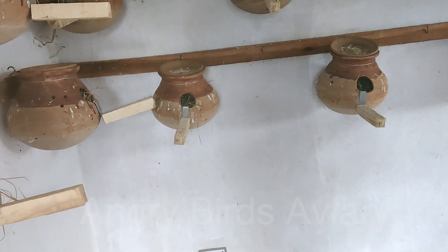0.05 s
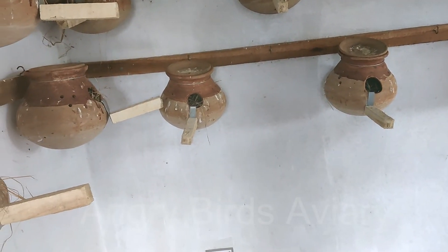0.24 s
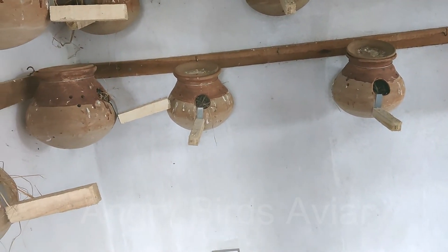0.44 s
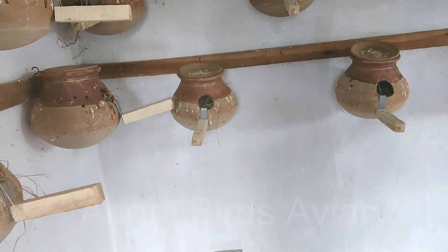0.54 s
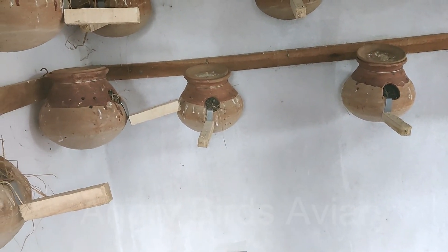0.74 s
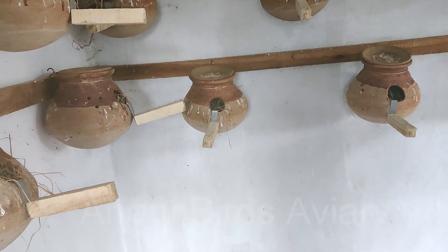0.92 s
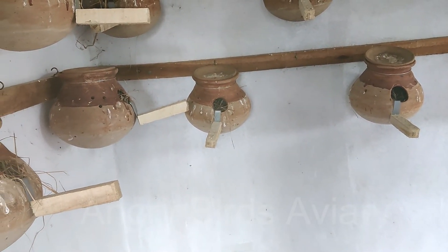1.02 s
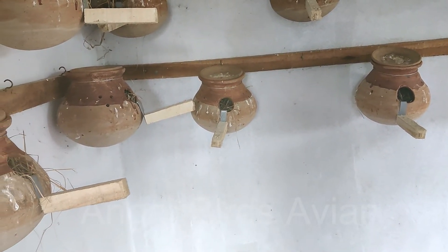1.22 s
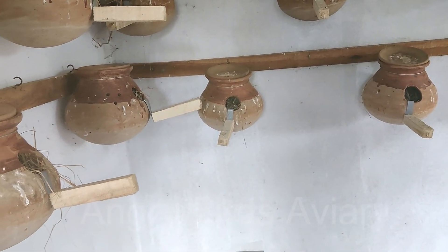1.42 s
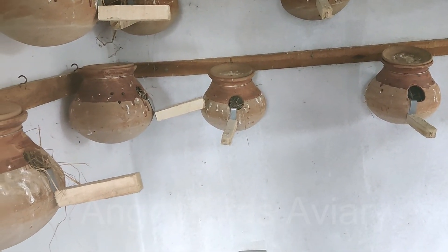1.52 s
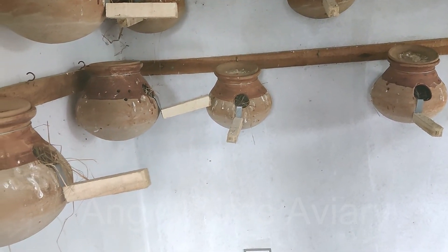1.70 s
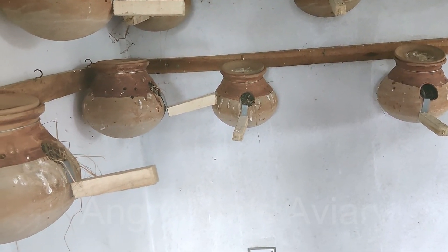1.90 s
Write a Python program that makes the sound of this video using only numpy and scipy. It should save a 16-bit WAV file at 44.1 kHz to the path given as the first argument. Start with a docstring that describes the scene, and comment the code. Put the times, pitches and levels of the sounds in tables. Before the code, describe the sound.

Short, high finch chips and fainter warbled peeps ring off bare aviary walls.

```python
"""Small finches in a hard-walled aviary. Room air, a faint rustle and a wavering low hum run throughout.
In the first 0.8 s one or two close birds give short upswept chips, their overtones shaped by the throat.
From about 1 s the rustle dies down and others answer from farther off with thin warbled peeps.
The bare walls make every call ring on."""
import sys
import numpy as np
from scipy import signal
from scipy.fft import rfft, irfft
from scipy.io import wavfile

SR = 44100
rng = np.random.default_rng(int(sys.argv[2]) if len(sys.argv) > 2 else 0)


def output_pcm(signal):
    """Save a mono or channel-first signal as 16-bit PCM at the path in sys.argv[1].

    Samples are clipped to [-1, 1] before scaling.
    """
    pcm = np.clip(np.atleast_2d(signal).T, -1, 1) * 32767
    wavfile.write(sys.argv[1], SR, np.round(pcm).astype(np.int16))


N = 85995

# Room air, spectral shape: freq_hz, density_db
AIR_SPECTRUM = [(35, -33.5), (60, -7), (132, 0.5), (219, -16), (399, -10.5), (514, -13), (1360, -20.5),
                (2710, -16), (3270, -13.5), (4410, -23.5), (6380, -19.5), (7000, -24), (7500, -62),
                (9020, -37), (15000, -56.5)]
# Rustle, spectral shape: freq_hz, density_db
RUSTLE_SPECTRUM = [(150, -4), (400, -5.5), (800, -12), (1300, -6.5), (2200, -2.5), (3200, -9.5), (4300, -5),
                   (6600, -5), (7700, -21), (9800, -21.5), (12000, -32.5), (15000, -31.5)]
# Rustle envelope: time_s, level_db
RUSTLE_ENVELOPE = [(0, -38), (.025, -45), (.11, -50.5), (.2, -44), (.42, -52), (.5, -47.5), (.65, -49.5),
                   (.85, -53.5), (1.0, -59.5), (1.95, -75.5)]
# Low hum envelope: time_s, level_db
HUM_ENVELOPE = [(0.0, -48.5), (0.102, -40), (0.314, -43), (0.504, -59.5), (0.65, -52), (0.754, -60.5),
                (1.128, -61), (1.226, -53), (1.618, -49), (1.95, -58.5)]
# Drone lines: pitch_hz, base_level_db
DRONE_LINES = [(118.4, -61.5), (172.3, -71.5)]
# Gain on both drone lines: time_s, gain_db
DRONE_ENVELOPE = [(0, 11.5), (.2, 7), (.35, -0.5), (.52, 9), (.8, 0), (1.2, -4.5), (1.95, -3.5)]
# Distant peeps: start_s, length_s, from_hz, to_hz, warble_ratio, gain_db, octave_db, pan_db
FAR_PEEPS = [(1.056, 0.027, 3403, 3230, 0.038, -46.5, -33, -14.5),
             (1.061, .080, 2998, 2994, 0.054, -43, -18, -2.5),
             (1.138, .080, 3253, 2830, 0.035, -43.5, -11.5, -4.5),
             (1.28, 0.067, 3200, 3400, 0.089, -48, -37, -4),
             (1.328, 0.051, 3250, 3316, 0.044, -44, -22, -10.5),
             (1.336, 0.06, 3970, 3850, 0.11, -42.5, -32, -1.5), (1.531, .085, 4150, 3550, 0.1, -46, -35, 2),
             (1.576, 0.093, 3630, 4080, 0.084, -39, -54, -4), (1.613, .048, 5328, 4876, .10, -34, -44, -4),
             (1.588, 0.079, 2356, 2420, 0.1405, -53, 13.5, -7),
             (1.683, 0.11, 4697, 4650, 0.066, -43.5, -55, -2),
             (1.745, 0.08, 3827, 3615, 0.076, -34.5, -61, -2),
             (1.771, 0.05, 6500, 6200, 0.04, -44, -74, -1),
             (1.817, 0.0737, 3750, 3473, 0.056, -46.5, -51, -14.5),
             (1.896, 0.057, 2464, 2464, 0.0033, -56, -16, -6)]
# Close chips: start_s, length_s, top_hz, sweep_ratio, rise_s, throat_hz, gain_db,
# partial1_db, partial2_db, partial3_db, partial4_db, pan_db
CLOSE_CHIPS = [(0.024, 0.014, 2196, 0.051, 0.0022, 3880, -56.5, 17, -8, 10, -29, -19),
               (0.164, 0.025, 2071, 0.37, 0.005, 4120, -35, 8.5, 2.5, -1.5, -15.5, -4),
               (0.329, 0.025, 1942, 0.33, 0.0041, 3800, -35, -2.5, -0.5, 2.5, -23, -4.5),
               (0.332, .017, 1477, 0.41, 0.0044, 2600, -38, -27.5, 6, 8, -14, -4),
               (0.504, 0.024, 1590, 0.21, 0.00486, 3870, -25.5, -11.5, 1, -1.5, -17, -2),
               (0.59, 0.0238, 1641, 0.2084, 0.00638, 3560, -21.5, -35, 2, -2, -8, -0.5),
               (0.669, 0.018, 1808, 0.26, 0.0067, 3120, -22.5, -18, 1.5, -7.5, -8, -3),
               (0.793, .019, 1671, 0.182, 0.0049, 3460, -18.5, -21, -0.5, -2.5, -18, -3)]

ROOM_T60_S, TREBLE_T60_S, BUILD_S, EARLY_S = 0.43, 0.13, 0.012, 0.091
SLAP_S, SLAP_GAIN = 0.0174, 0.49
WARBLE_HZ, JITTER_HZ = 133.3, 850


def undb(db):
    """Decibels to gain."""
    return 10 ** (np.asarray(db) / 20)


def unit_rms(x):
    """Scale to rms 1."""
    return x / np.sqrt(np.mean(x ** 2))


def pan(db):
    """Stereo gains for a left-minus-right level."""
    return undb(np.array([[db], [-db]]) / 2)


def envelope(points):
    """Gain over time from time_s, level_db points."""
    return undb(np.interp(np.arange(N) / SR, *np.array(points).T))


def swell(t, length_s, attack_s, release_s):
    """Smooth attack, hold and release."""
    attack = np.sin(np.pi / 2 * np.clip(t / attack_s, 0, 1)) ** 2
    release = np.sin(np.pi / 2 * np.clip((length_s - t) / release_s, 0, 1)) ** 2
    return attack * release


def wander(bandwidth_hz, size=N):
    """Smooth random motion, rms 1."""
    f = np.fft.rfftfreq(size, 1 / SR)
    return unit_rms(irfft(rfft(rng.standard_normal(size)) * np.exp(-(f / bandwidth_hz) ** 2), size))


def tremble(t, bandwidth_hz):
    """Random motion over one call."""
    return wander(bandwidth_hz, size=8192)[:len(t)]


def add(out, start_s, sound):
    """Mix in a stereo sound."""
    i = int(start_s * SR)
    out[:, i:i + sound.shape[1]] += sound[:, :max(N - i, 0)]


def stereo_noise(spectrum, alike_below_hz=800):
    """Shaped noise, rms 1, alike on both sides only in the bass."""
    f = np.fft.rfftfreq(N, 1 / SR) + 1
    hz, db = np.array(spectrum).T
    shape = undb(np.interp(np.log(f), np.log(hz), db)) / np.hypot(1, (hz[0] / f) ** 2)
    mid, side = rfft(rng.standard_normal((2, N))) * shape
    side = side * f / np.hypot(f, alike_below_hz)
    return unit_rms(irfft(np.array([mid + side, mid - side]), N))


def drifting_tone(hz, drift_ratio):
    """Sine of slowly wandering pitch, rms 1."""
    pitch_hz = hz * (1 + drift_ratio * wander(5.7))
    return np.sqrt(2) * np.sin(2 * np.pi * np.cumsum(pitch_hz) / SR)


def room_air():
    """Steady noise of the room's air."""
    return undb(-59.5) * stereo_noise(AIR_SPECTRUM)


def rustle():
    """Soft noise, slightly to the right, dying down."""
    noise = stereo_noise(RUSTLE_SPECTRUM)
    flicker_db = 0.5 * wander(40)
    return pan(-2) * noise * envelope(RUSTLE_ENVELOPE) * undb(flicker_db)


def hum(pitch_hz=43.1):
    """Low hum that swells and fades under two unsteady drone lines."""
    drone = sum(undb(db) * drifting_tone(hz, drift_ratio=0.0231) * (1 + 0.39 * wander(60))
                for hz, db in DRONE_LINES)
    low = drifting_tone(pitch_hz, drift_ratio=0.007) * (1 + 0.12 * wander(25))
    return envelope(HUM_ENVELOPE) * low + envelope(DRONE_ENVELOPE) * drone


def aviary(call, direct_db, room_db, direct_pan_db=0, right_lag_s=0.00005):
    """Direct sound, then wall echoes that thicken and decay, treble first."""
    t = np.arange(N // 3) / SR
    echoes = rng.standard_normal((2, len(t)))
    clumps = np.repeat(rng.standard_normal((2, len(t) // 32 + 1)), 32, axis=1)[:, :len(t)]
    sparseness = np.exp(-t / EARLY_S)  # early echoes stand apart, later ones merge
    echoes = echoes * np.exp(sparseness * clumps - sparseness ** 2) * (1 - np.exp(-t / BUILD_S))
    low = signal.sosfiltfilt(signal.butter(2, 5500, fs=SR, output="sos"), echoes)
    response = low * undb(-60 * t / ROOM_T60_S) + (echoes - low) * undb(-60 * t / TREBLE_T60_S)
    wet = signal.fftconvolve(call[None], response, axes=1)
    wet *= np.sqrt(np.sum(call ** 2) / np.sum(wet ** 2, axis=1, keepdims=True))
    left = np.pad(call, (0, len(t) - 1))
    direct = np.array([left, np.roll(left, int(right_lag_s * SR))])
    return undb(room_db) * wet + undb(direct_db) * pan(direct_pan_db) * direct


def far_peeps(jitter_ratio=0.032):
    """Gliding whistles with a fast, uneven warble, heard mostly off the walls."""
    out = np.zeros((2, N))
    for start_s, length_s, from_hz, to_hz, warble_ratio, gain_db, octave_db, pan_db in FAR_PEEPS:
        t = np.arange(int(length_s * SR)) / SR
        glide_hz = from_hz + (to_hz - from_hz) * t / length_s
        warble = np.sin(2 * np.pi * WARBLE_HZ * t + tremble(t, WARBLE_HZ))
        pitch_hz = glide_hz * (1 + warble_ratio * warble + jitter_ratio * tremble(t, JITTER_HZ))
        phase = 2 * np.pi * np.cumsum(pitch_hz) / SR
        voice = np.sin(phase) + undb(octave_db) * np.sin(2 * phase)
        voice *= swell(t, length_s, attack_s=0.48 * length_s, release_s=0.48 * length_s)
        heard = aviary(voice, direct_db=-2, room_db=2)
        add(out, start_s, undb(gain_db) * pan(pan_db) * heard)
    return out


def throat(hz, centre_hz, width_hz=1190):
    """Gain of the bird's throat resonance."""
    return 1 / np.hypot(1, (hz / centre_hz - centre_hz / hz) * centre_hz / width_hz)


def scratch(throat_hz, top_hz=5400, size=4096):
    """Noisy part of the voice, centred on the throat resonance."""
    f = np.fft.rfftfreq(size, 1 / SR) + 1
    band = 1 / np.hypot(1, (f / top_hz) ** 4) / np.hypot(1, (throat_hz / 2 / f) ** 4)
    return unit_rms(irfft(rfft(rng.standard_normal(size)) * throat(f, throat_hz) * band, size))


def close_chips(droop_ratio=0.017, rasp_depth=0.28, scratch_db=-10):
    """Pitch shoots up, levels off and droops; the throat shapes partials and scratch."""
    out = np.zeros((2, N))
    upper_db = [-22, -24, -26, -28]  # partials 5 to 8
    for chip in CLOSE_CHIPS:
        start_s, length_s, top_hz, sweep_ratio, rise_s, throat_hz, gain_db, *lower_db, pan_db = chip
        t = np.arange(int(length_s * SR)) / SR
        onset = np.exp(-(t / rise_s) ** 2 / 2)
        pitch_hz = top_hz * (1 - sweep_ratio * onset - droop_ratio * (t / length_s) ** 4)
        jitter_ratio = 0.018 + 0.055 * onset  # rough on the way up, steadier at the top
        phase = 2 * np.pi * np.cumsum(pitch_hz * (1 + jitter_ratio * tremble(t, JITTER_HZ))) / SR
        tone = sum(undb(db) * throat(k * pitch_hz, throat_hz) * np.sin(k * phase)
                   for k, db in enumerate(lower_db + upper_db, 1))
        voice = tone * (1 + rasp_depth * tremble(t, JITTER_HZ))
        voice += undb(scratch_db) * np.std(tone) * scratch(throat_hz)[:len(t)]
        voice *= swell(t, length_s, attack_s=0.005, release_s=0.0027)
        heard = aviary(voice, direct_db=-0.5, room_db=5, direct_pan_db=-3)
        add(out, start_s, undb(gain_db) * pan(pan_db) * heard)
    return out


def scene():
    """Birds, rustle and air with one short, strong echo; the hum stays dry."""
    room = close_chips() + far_peeps() + rustle() + room_air()
    slap = np.pad(room, ((0, 0), (int(SLAP_S * SR), 0)))[:, :N]
    return room + SLAP_GAIN * slap + hum()


def record(dry):
    """Short fades at both ends, low-pass at 15.5 kHz."""
    fades = swell(np.arange(N) / SR, N / SR, attack_s=0.004, release_s=0.004)
    return signal.sosfilt(signal.ellip(10, 0.2, 80, 15500, fs=SR, output="sos"), dry * fades)


dry = scene()
out = record(dry)
output_pcm(out)
```